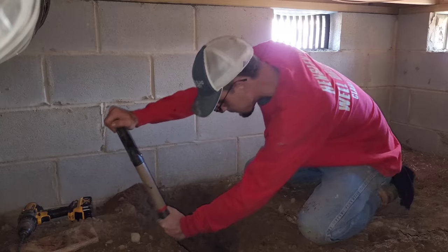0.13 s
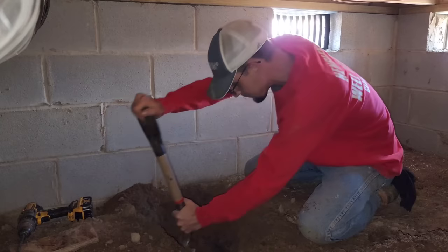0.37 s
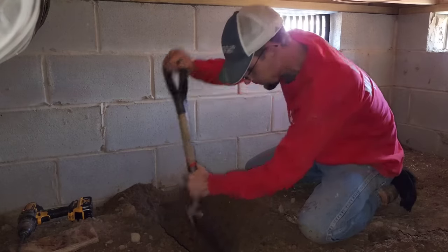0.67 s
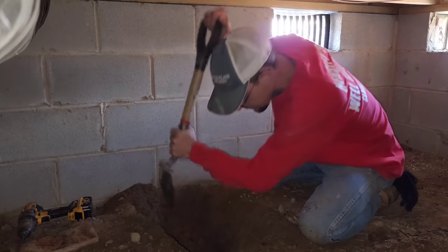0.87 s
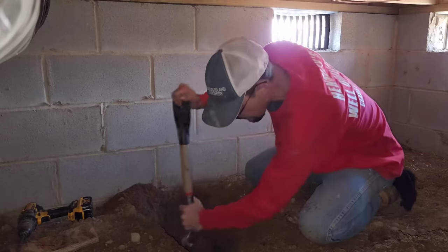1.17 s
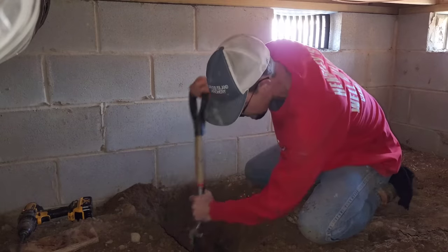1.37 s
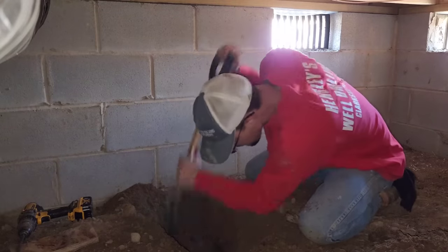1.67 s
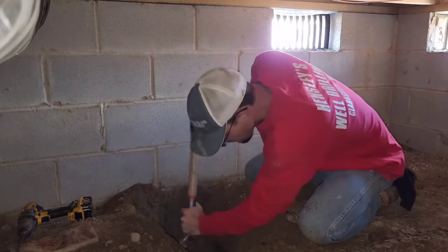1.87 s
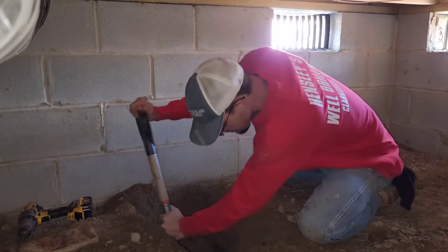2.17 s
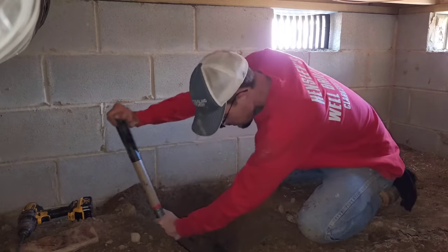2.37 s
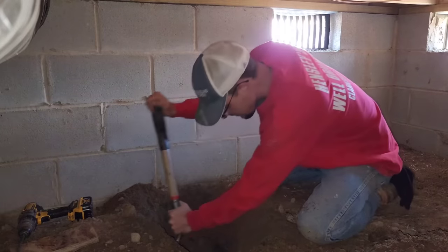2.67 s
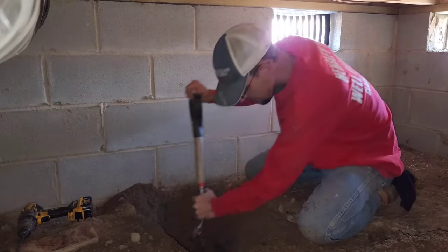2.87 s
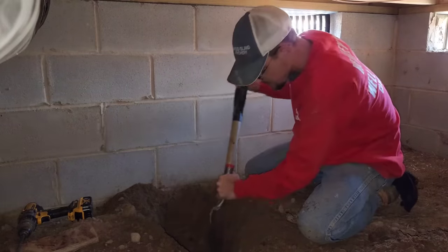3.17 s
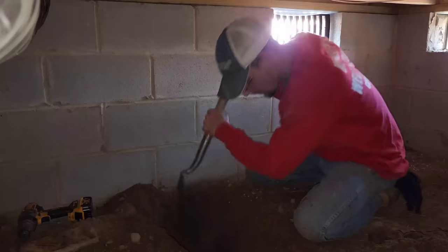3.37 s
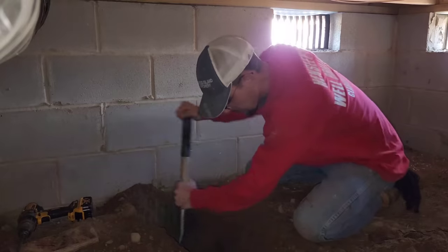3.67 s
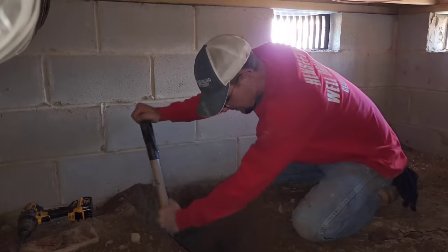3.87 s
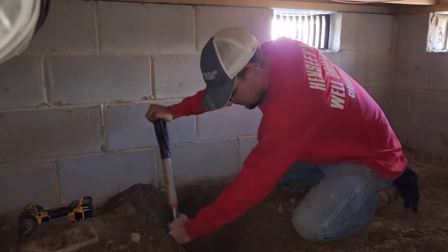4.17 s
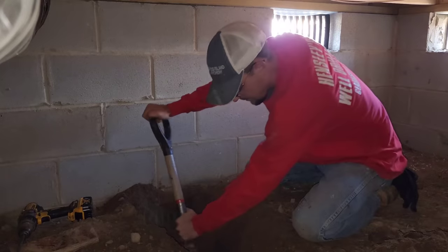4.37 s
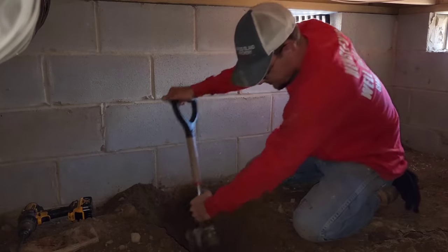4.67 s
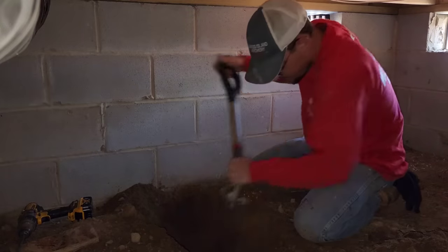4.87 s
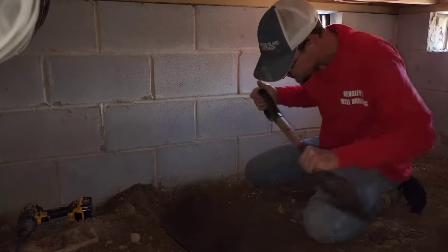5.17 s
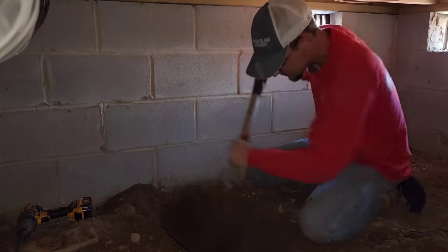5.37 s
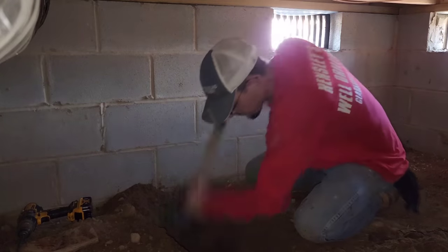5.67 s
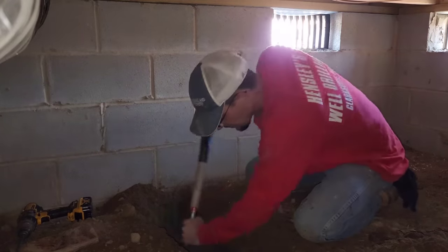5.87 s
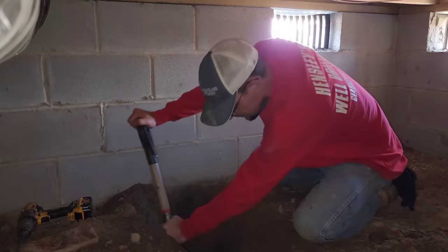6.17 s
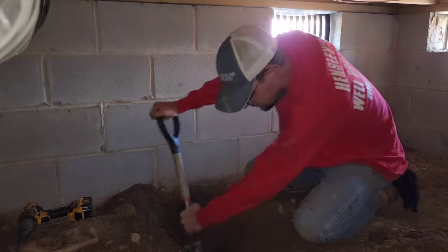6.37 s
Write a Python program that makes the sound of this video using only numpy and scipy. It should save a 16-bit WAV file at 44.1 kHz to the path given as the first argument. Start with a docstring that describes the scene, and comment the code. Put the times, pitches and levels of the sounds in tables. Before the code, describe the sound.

A short steel shovel digs rocky soil, heard close up in a low crawl space with very short echoes and a faint, steady low hum. For the first second the blade drags over grit and catches on stones with small knocks. At 1.2 seconds it chops in with a loud crunch, a knock and a thud, then clips a pebble with a brief, high ring at 1.5. A light chop follows at 1.9. Around 2.4 seconds the blade knocks sharply against stones and pries in a quick run of slips, with more scraping near 3. A second hard chop lands at 3.7, followed by grinding, juddering leverage until about 4.6. Softer scrapes, stone ticks and low tumbling clods come around 5 seconds. The last hard chop hits at 5.9, and the blade keeps dragging and catching until the end, at about 6.5 seconds.

```python
"""A short steel shovel digs rocky soil in a low crawl space with block walls, over a faint low hum.
The blade drags over grit and catches on stones, then chops in with a crunch and a thud at 1.2 s.
Lifted clear, it clips a pebble and rings at 1.5 s. A light chop follows at 1.9 s, and at 2.5 s the
blade pries in a quick run of slips. Two more hard chops land at 3.7 and 5.9 s; between them and
to the end the blade is levered and dragged, grinding and juddering."""
import sys
import numpy as np
from scipy import signal
from scipy.fft import rfft, irfft
from scipy.io import wavfile

SR = 44100
rng = np.random.default_rng(int(sys.argv[2]) if len(sys.argv) > 2 else 0)


def store_wav(level_fs):
    """Save 16-bit WAV to argv[1]."""
    pcm = np.round(np.clip(np.atleast_2d(level_fs), -1, 1) * 32767)
    wavfile.write(sys.argv[1], SR, pcm.T.astype(np.int16))


N = 287532
T = np.arange(N) / SR


def shovel():
    """Chops, catches and dragging crush grit, shake the blade and thump the ground."""
    slide, judder = dragging()
    # envelopes for coarse grit, fine sand, blade rattle and ground thud; each gesture adds its share
    crush, fine = slide.copy(), slide * undb(0.5)
    rattle, thud = np.zeros((2, N))
    knocks = chops(crush, fine, rattle, thud) + catches(crush, fine, rattle)
    stone_flicks(crush, fine)
    grit, coarse_crunch = crushed_grit(crush, fine, slide)
    # the edge sticks and slips, each slip a small blow on the blade
    slips = judder * grains(rate=220, spread_db=2.5) + rattle * grains(rate=2300, spread_db=0.5)
    return grit + held_blade(slips) + rasp(coarse_crunch, slips) + knocks + ground(thud) + prying()


# Chops into the ground. Each row: start in seconds, rise and decay in seconds, crunch in dB,
# treble offset in dB, blade rattle in dB, knock in dB, its pitch in Hz, clang in dB, thud in dB,
# its pitch in Hz.
GROUND_CHOPS = [ (1.163, 0.005, 0.017, -13.5, 0, -23, -7, 645, -36.5, -20, 86),
                (1.903, 0.0082, 0.017, -29.5, 2, -29, -44.5, 503, -46, -42, 90.3),
                (3.722, 0.0026, 0.01, -10.5, 0, -9.5, -16.5, 387.5, -19, -16, 131.8),
                (5.908, 0.019, 0.0095, -12.5, 0.5, -16.5, -20, 409, -20.5, -20, 149)]


def chops(crush, fine, rattle, thud, clang_hz=845):
    """The edge drives into the soil: adds to the envelopes, returns the knocks, clangs and thumps."""
    out = np.zeros(N)
    for s, rise, decay, *voicing in GROUND_CHOPS:
        crunch_db, treble_db, rattle_db, knock_db, knock_hz, clang_db, thud_db, thud_hz = voicing
        # the tip brushes through loose crumbs just before it bites
        add(crush, s - .012, undb(crunch_db - 15) * burst(rise=0.033, decay=0.006))
        add(crush, s, undb(crunch_db) * burst(rise, decay))
        add(fine, s, undb(crunch_db + treble_db) * burst(rise, decay))
        # the edge bites with a bright crack; crumbs trickle down after it
        add(fine, s + rise / 2, undb(crunch_db + 3) * burst(rise=0.00094, decay=0.002))
        add(crush, s, undb(crunch_db - 36.5) * burst(rise=0.023, decay=0.017))
        add(rattle, s + 0.0028, undb(rattle_db) * burst(rise, 0.97 * decay))
        add(out, s + 0.69 * rise, undb(knock_db) * knock(knock_hz, swell=0.0033))
        add(out, s + .8 * rise, undb(clang_db) * knock(clang_hz, swell=0.0071))
        # the ground takes the weight only after the edge has cut in
        add(out, s + rise, undb(thud_db - 4) * knock(thud_hz, swell=0.0076))
        add(out, s + rise, undb(thud_db - 11.5) * knock(hz=69.6, swell=0.0061))
        add(thud, s + 0.44 * rise, undb(thud_db - 3) * burst(rise=0.0034, decay=0.031))
    return out


# Snags on stones. Each row: start in seconds, rise in seconds, crunch in dB, treble offset in dB,
# knock in dB, its pitch in Hz.
STONE_CATCHES = [ (.010, 0.0018, -35.5, -11, -32.5, 616), (.028, .001, -77, -11, -27.5, 666),
                 (.061, .005, -30, -2, -26, 645), (.352, 0.0038, -73, 0, -44, 643),
                 (.413, 0.02, -41, 1, -26, 497), (.487, .0085, -25, -4, -28.5, 610),
                 (.502, 0.0042, -13.5, 2.5, -28, 592), (.657, 0.0052, -32.5, -3, -35, 674),
                 (.681, .019, -24, -16, -26, 625), (.712, 0.018, -21, 0, -26.5, 790),
                 (2.289, 0.0019, -78, -3, -41, 617), (2.370, 0.0018, -21, -4.5, -10.5, 560),
                 (2.418, 0.0021, -15, -5, -14, 505), (2.437, 0.0034, -33, 1, -19, 560),
                 (2.475, 0.0021, -26, -7.5, -22.5, 517), (2.944, .02, -51, 0.5, -39, 628),
                 (2.964, .004, -48, 2, -34, 640), (2.975, 0.0074, -27.5, -5, -27, 682),
                 (3.075, .012, -40, 6, -27.5, 658), (4.0, .014, -30, -24, -28, 634),
                 (4.163, .0036, -61, -2, -26, 545), (4.184, 0.0055, -34.5, 0.5, -37, 650),
                 (4.328, 0.0049, -43, -4, -41, 596), (4.440, 0.0086, -51, -12, -41.5, 618),
                 (4.478, .0062, -27, -7.5, -27.5, 647), (4.525, 0.0022, -18.5, -15, -28, 650),
                 (5.049, .001, -17.5, 2, -35, 800), (6.168, .003, -42, -5, -33, 650),
                 (6.28, 0.0081, -51, -2, -37, 630), (6.507, 0.012, -32, 0, -32, 664)]


def catches(crush, fine, rattle):
    """The blade catches on a stone and slips off: adds to the envelopes, returns the knocks."""
    out = np.zeros(N)
    for s, rise, crunch_db, treble_db, knock_db, hz in STONE_CATCHES:
        force = burst(rise, decay=.0036 + .45 * rise)  # a slow catch also lets go slowly
        add(crush, s, undb(crunch_db) * force)
        add(fine, s, undb(crunch_db + treble_db) * force)
        # the edge scuffs over the stone just before it catches
        add(crush, s - .007, undb(crunch_db - 15) * burst(rise=0.0044, decay=0.0021))
        add(rattle, s, undb(knock_db - 2.5) * force)
        add(out, s + 0.44 * rise, undb(knock_db) * knock(hz, swell=.0022))
    return out


def knock(hz, swell):
    """The buried blade flexes for a few cycles; its pitch depends on how tightly the soil grips it."""
    t = T[:SR // 8]
    return np.sqrt(2) * t / swell * np.exp(1 - t / swell) * np.sin(2 * np.pi * hz * t)


# Drags and levering strokes. Each row: start in seconds, length in seconds, sliding grit in dB,
# blade judder in dB, swell across the stroke in dB.
DRAG_STROKES = [ (0, .14, -50, -39, -6), (0.193, 0.056, -66.5, -64, -7), (0.336, 0.17, -59.5, -45, 10),
                (0.413, 0.12, -39.5, -44, 1.5), (0.542, 0.093, -56, -42, -11),
                (0.676, 0.085, -35.5, -47, -4), (0.757, 0.094, -66, -53.5, -14),
                (1.491, 0.065, -62.5, -68, 10), (2.024, 0.022, -59.5, -74, -1),
                (2.11, 0.098, -62.5, -53.5, 8.5), (2.219, 0.13, -63, -60.5, -11),
                (2.38, 0.021, -55, -35.5, -2), (2.413, .18, -47, -33, -3.5), (2.726, .025, -68.5, -56.5, 3),
                (2.95, 0.14, -47.5, -49, 2.5), (3.115, 0.099, -63.5, -44.5, -9.5),
                (3.235, 0.17, -65, -50.5, 7.5), (3.402, 0.047, -46, -77, -3), (3.788, 0.085, -62, -65, -2),
                (3.855, .16, -48.5, -44, 3.5), (4.041, 0.08, -47.5, -43.5, -3.5),
                (4.162, 0.13, -52.5, -44, -13.5), (4.316, 0.037, -47, -37.5, 9),
                (4.396, 0.059, -57, -73, -6), (4.485, 0.13, -42.5, -37.5, 4), (4.76, .11, -55.5, -58, 18),
                (4.896, 0.12, -55, -53.5, 3), (5.229, .09, -62, -61, -0.5), (5.408, .1, -65, -76, 7),
                (5.518, 0.097, -69, -83.5, -13.5), (5.974, 0.042, -51.5, -48, -2),
                (6.074, .08, -51, -54, -2), (6.175, 0.13, -47.5, -41, -4.5), (6.314, 0.15, -69.5, -52.5, 4),
                (6.45, 0.058, -49.5, -43, 0)]


def dragging(lead_s=.06):
    """Envelopes of sliding grit and blade judder; both waver as the soil gives."""
    slide, judder = np.zeros((2, N))
    for s, length, grit_db, judder_db, swell_db in DRAG_STROKES:
        pressure = stroke(T[:SR] - lead_s, length, swell_db)
        add(slide, s - lead_s, undb(grit_db) * pressure)
        add(judder, s - lead_s, undb(judder_db) * pressure)
    return slide * flutter(rate=140, depth_db=1.26), judder * flutter(rate=70, depth_db=2.5)


def stroke(t, length, swell_db, attack_db_per_s=749, release_s=0.015):
    """Pressure builds, grows or eases through the stroke and lets go; loose soil trickles after it."""
    attack = undb(attack_db_per_s * np.minimum(t - .013, 0))
    hold = undb(swell_db * (np.clip(t / length, 0, 1) - .5))
    after = np.maximum(t - length, 0)
    trickle = undb(-19) * np.exp(-after / 0.065)
    return attack * hold * np.maximum(np.exp(-after / release_s), trickle)


# The tone of the crunch. Each row: frequency in Hz, level in dB.
GRIT_TONE = [(100, -17), (300, -11.5), (600, -3.5), (1000, -2.5), (1800, -5), (3000, -3.5), (5000, -4),
             (7600, -4), (10000, -11.5), (12500, -7.5), (15500, -12.5)]
# High steel modes that grit sets singing. Each row: pitch in Hz, width in Hz, level in dB.
SINGING_MODES = [(4070, 29, -6.5), (4540, 53, -15), (6330, 20, -7), (7180, 280, 7.5)]


def crushed_grit(crush, fine, slide):
    """Grit crunches, sand hisses, pebbles tick: returns the whole sound and the raw coarse crunch."""
    fractures = grains(rate=7000, spread_db=5.5)
    coarse = signal.sosfiltfilt(signal.butter(2, 6000, fs=SR, output="sos"), fractures)
    coarse_crunch = crush * coarse
    sand = fine * (fractures - coarse)
    pebbles = undb(-1) * slide * grains(rate=55, spread_db=3)
    crunch = coarse_crunch + sand + pebbles
    # only hard contact makes the steel sing; light sliding stays a dry hiss
    hardness = np.tanh(crush / undb(-34.5))
    singing = undb(-18) * through(hardness * crunch, resonances(SINGING_MODES))
    return through(crunch, colour(GRIT_TONE)) + singing, coarse_crunch


# Modes of the blade held in soil. Each row: pitch in Hz, width in Hz, level in dB.
BURIED_MODES = [(338.3, 61, -1), (452.2, 19, -3.5), (560, 140, -2.5), (628, 68, 7.5), (693, 26, -9),
                (830, 120, -13), (1025, 55, -9), (1387, 71, -14)]
# The tone of the judder. Each row: frequency in Hz, level in dB.
JUDDER_TONE = [(60, -25), (200, -10), (300, -6), (420, 7), (680, 2.5), (1150, -6.5), (2000, -13.5),
               (5000, -43)]


def held_blade(slips):
    """Slips shake the soil-damped blade into a short ring and a dull judder."""
    ring = undb(-2.5) * through(slips, resonances(BURIED_MODES))
    return ring + undb(-3) * through(slips, colour(JUDDER_TONE))


# The blade's midrange modes. Each row: pitch in Hz, width in Hz, level in dB.
RASP_MODES = [(1013, 21, 3), (1234, 99, 0), (1584, 220, 2), (2040, 27, -8.5), (2350, 120, -4),
              (2500, 110, -17.5)]


def rasp(coarse_crunch, slips):
    """The steel rasps as its edge grinds on stone."""
    return through(undb(-12) * coarse_crunch + undb(-16.5) * slips, resonances(RASP_MODES))


# Clods breaking loose or landing. Each row: start in seconds, level in dB.
LOOSE_CLODS = [(0.03, -40.5), (2.528, -38.5), (4.002, -40), (4.139, -39.5), (4.928, -43), (5.03, -48),
               (5.248, -52)]
# Low modes of the ground and shaft. Each row: pitch in Hz, width in Hz, level in dB.
GROUND_MODES = [(48.4, 36, -10.5), (86, 9.5, -3.5), (126.9, 7.5, -1.5), (172.4, 7.2, -4.5),
                (219.7, 110, -2), (334.3, 67, 2), (467, 110, -5.5)]


def ground(thud):
    """Chops and clods set the ground and shaft rumbling."""
    weight = thud.copy()
    for s, db in LOOSE_CLODS:
        add(weight, s, undb(db) * burst(rise=0.049, decay=0.038))
    return through(weight * grains(rate=4300, spread_db=2), resonances(GROUND_MODES))


def prying(start_s=2.536, count=4, slips_per_s=45):
    """Prying hard, the blade sticks and slips, each slip lower and weaker as the clod gives way."""
    out = np.zeros(N)
    for t in (np.arange(count) + rng.uniform(-.1, 0.08, count)) / slips_per_s:
        add(out, start_s + t, undb(-25 - 20 * t) * knock(hz=448 - 1020 * t, swell=.003))
    return out


# Small stone ticks. Each row: start in seconds, level in dB.
STONE_FLICKS = [(0.383, -39), (2.071, -43.5), (2.188, -52.5), (3.954, -44), (4.068, -43), (4.952, -38),
                (5.064, -38), (5.18, -53), (5.2, -50.5), (5.316, -50), (6.07, -37)]


def stone_flicks(crush, fine):
    """Stones flick off the steel, each adding a short, bright burst to the grit envelopes."""
    for s, db in STONE_FLICKS:
        flick = undb(db) * burst(rise=0.0038, decay=0.0096)
        add(fine, s, flick)
        add(crush, s, undb(-6) * flick)


# A clink and its faint afterbeat. Each row: start in seconds, scratch in dB, ring in dB.
PEBBLE_CLINKS = [(1.545, -35, -46), (1.642, -71.5, -66)]
# Modes of the blade in the air. Each row: pitch in Hz, level in dB, seconds to fade by 60 dB.
FREE_MODES = [(3472, 0, .26), (4177, -4, .29), (4334, -9, .27), (4570, -5, .33), (4890, -7, .14),
              (5324, -4, .22), (5992, -8, .15), (8027, -2, .12)]


def clinks():
    """The lifted blade clips a pebble; with no soil to damp it, the steel rings on."""
    out, t = np.zeros(N), T[:SR // 2]
    ring = sum(undb(db - 60 * t / t60) * np.sin(2 * np.pi * hz * t) for hz, db, t60 in FREE_MODES)
    scratch_tone = colour([(300, -11.5), (2000, -16), (7000, 3), (15000, -5)])
    for s, scratch_db, ring_db in PEBBLE_CLINKS:
        scratch = through(grains(rate=1600, spread_db=-1), scratch_tone)[:len(t)]
        add(out, s, undb(scratch_db) * burst(rise=0.0054, decay=.014) * scratch)
        add(out, s + .004, undb(ring_db) * ring)
    return out


def near_echoes(decay, count=60):
    """First reflections off the pit, wall and joists, each reaching left and right at its own times."""
    delay = .0006 + 4 * decay * (np.arange(count) + rng.random(count)) / count
    size = np.exp(-delay / decay) * rng.choice([-1, 1], count)
    lag = .00022 * rng.uniform(-1, 1, count)
    return [unit(np.bincount(np.abs((delay + side * lag) * SR).astype(int), size)) for side in (-1, 1)]


def moving_echoes(x, size=8192):
    """As the blade moves, one pattern of first reflections fades into the next."""
    out = np.zeros((2, N))
    fade = np.sin(np.linspace(0, np.pi, size))
    for start in range(-size // 2, N, size // 2):
        first = max(start, 0)
        piece = x[first:start + size]
        piece = piece * fade[first - start:][:len(piece)]
        for channel, response in zip(out, near_echoes(decay=.007)):
            add(channel, first / SR, signal.fftconvolve(piece, response))
    return out


# The crawl space's tail. Each row: band centre in Hz, seconds to fade by 60 dB before t60_scale.
ROOM_DECAY = [(100, 0.56), (400, 0.29), (1000, 0.18), (4000, 0.18), (14000, 0.057)]


def walls(t60_scale):
    """Diffuse echoes from the close walls and joists; the treble dies away first."""
    t = T[:SR // 2]
    noise, out = rfft(rng.standard_normal(len(t))), 0
    hz = np.fft.rfftfreq(len(t), 1 / SR)
    for centre, t60 in ROOM_DECAY:
        band = on_log_axis(hz, [(f, f == centre) for f, _ in ROOM_DECAY])
        out = out + irfft(noise * band, len(t)) * np.exp(-np.log(1000) * t / (t60 * t60_scale))
    return unit(out * np.clip((t - .003) / 0.0031, 0, 1))


# The room tone. Each row: frequency in Hz, level in dB.
AIR_TONE = [(20, -7.5), (45, -18), (65, 1), (110, 3), (170, -13), (230, -16), (600, -21.5), (1200, -31.5),
            (4000, -35), (16000, -56)]
# The hum's two tones. Each row: pitch in Hz, level in dB.
HUM_TONES = [(86.1, -59.5), (145.3, -68)]


def background():
    """A wavering low hum over still air."""
    air = [undb(-59) * through(rng.standard_normal(N), colour(AIR_TONE)) for _ in range(2)]
    hum = 0
    for hz, db in HUM_TONES:
        waver = through(rng.standard_normal(N), resonances([(hz, 9, 0)]))
        tone = np.sin(2 * np.pi * hz * T + rng.uniform(0, 2 * np.pi))
        hum = hum + undb(db) * (tone + 0.87 * waver)
    return spread(*air, corner_hz=900) + hum


def grains(rate, spread_db):
    """Tiny fractures of uneven size and sign at random moments, rms 1."""
    moment, strength = rng.random(N), rng.uniform(-1, 1, N)
    at = np.flatnonzero(moment < rate / SR)
    size = np.minimum(-np.log(np.abs(strength[at])), np.pi)
    x = np.zeros(N)
    x[at] = np.sign(strength[at]) * undb(spread_db * size)
    return x / np.std(x)


def burst(rise, decay):
    """Force builds up smoothly, then dies away; times in seconds."""
    t = T[:SR // 2]
    return np.sin(np.pi / 2 * np.minimum(t / rise, 1)) ** 2 * np.exp(-np.maximum(t - rise, 0) / decay)


def flutter(rate, depth_db):
    """Gain that wanders as the pressure on the soil gives and holds."""
    steps = np.arange(0, T[-1] + 1, 1 / rate)
    return undb(depth_db * np.interp(T, steps, rng.standard_normal(len(steps))))


def resonances(modes):
    """Response of damped modes with alternating signs; dB is the relative power in each."""
    t, out = T[:SR // 5], 0
    for k, (hz, width, db) in enumerate(modes):
        mode = unit(np.exp(-np.pi * width * t) * np.sin(2 * np.pi * hz * t))
        out = out + (-1) ** k * undb(db) * mode
    return unit(out)


def colour(points, size=2048):
    """Causal response with the spectral shape of the (Hz, dB) points."""
    gain = undb(on_log_axis(np.fft.rfftfreq(size, 1 / SR), points))
    cepstrum = irfft(np.log(gain))
    cepstrum[1:size // 2] *= 2
    cepstrum[size // 2 + 1:] = 0
    return unit(irfft(np.exp(rfft(cepstrum))))


def spread(mid, side, corner_hz):
    """Left and right share the bass of a diffuse sound but not its treble."""
    side = signal.sosfilt(signal.butter(1, corner_hz, "high", fs=SR, output="sos"), side)
    return np.array([mid + side, mid - side])


def on_log_axis(hz, points):
    """Read (Hz, value) points at any frequency."""
    f, value = np.transpose(points)
    return np.interp(np.log(hz + 1), np.log(f), value)


def undb(db):
    """Decibels to gain."""
    return np.exp(np.asarray(db) * (np.log(10) / 20))


def unit(response):
    """Scale a response so that it keeps the power of white noise."""
    return response / np.sqrt(np.sum(response ** 2))


def through(x, response):
    """Pass a sound through a response."""
    return signal.oaconvolve(x, response)[:N]


def add(track, s, sound):
    """Mix a sound into a track at s seconds."""
    start = int(s * SR)
    sound, start = sound[max(-start, 0):], max(start, 0)
    track[start:start + len(sound)] += sound[:N - start]


def scene():
    """The blade works in a pit: its lows arrive straight, its treble mostly off nearby surfaces."""
    dry = shovel() + clinks()
    treble = signal.sosfiltfilt(signal.butter(1, 1100, "high", fs=SR, output="sos"), dry)
    straight = dry - .5 * treble
    # the blade is a little nearer on the left
    direct = np.array([undb(.5) * straight, undb(-.5) * np.roll(straight, 4)])
    near = undb([[-.3], [-2.3]]) * moving_echoes(treble)
    tail_mid = through(dry, walls(t60_scale=0.72))
    tail_side = through(dry, walls(t60_scale=0.8))
    tail = spread(tail_mid, tail_side, corner_hz=800)
    return direct + near + undb(-15.5) * tail + background()


def record(dry, top_hz=15700):
    """Round off the highest peaks and cut the extreme treble."""
    rounded = 1.3 * np.tanh(dry / 1.3)
    return signal.sosfilt(signal.ellip(8, .2, 70, top_hz, fs=SR, output="sos"), rounded)


dry = scene()
out = record(dry)
store_wav(out)
```